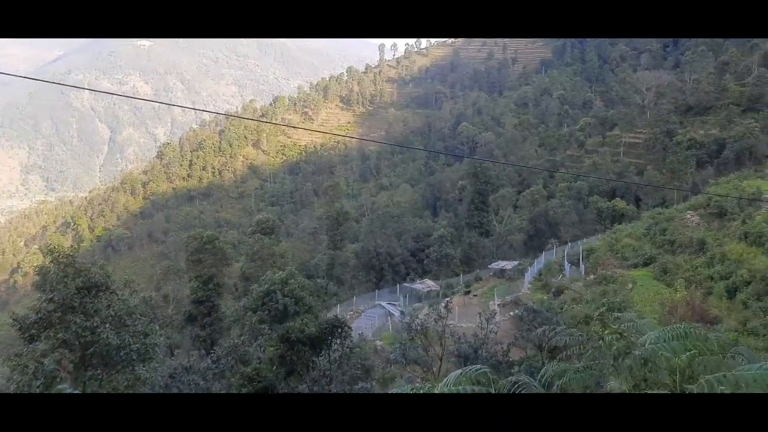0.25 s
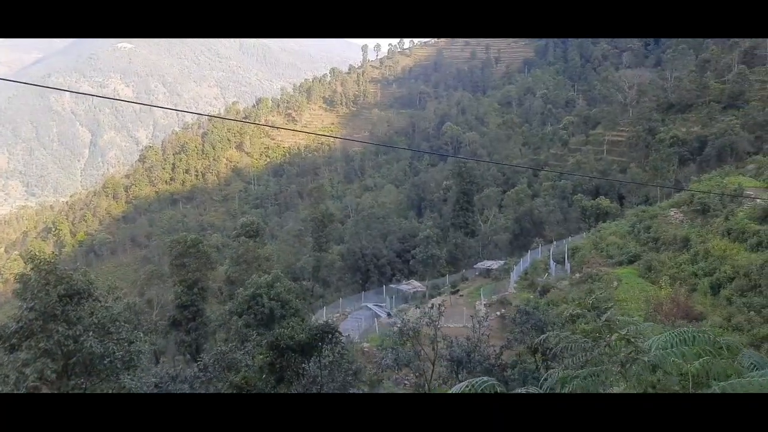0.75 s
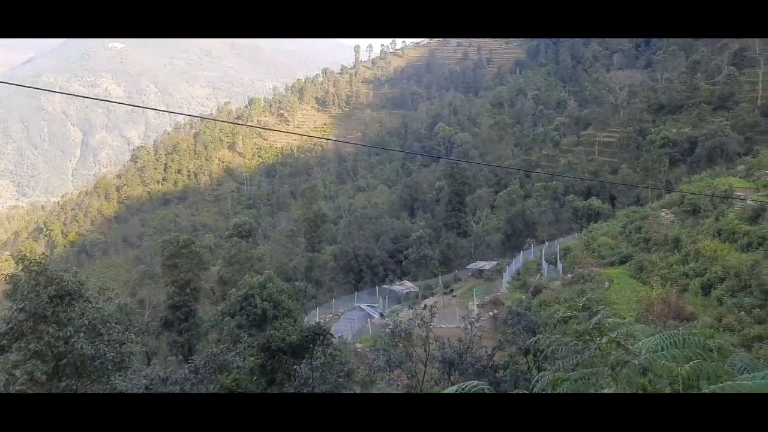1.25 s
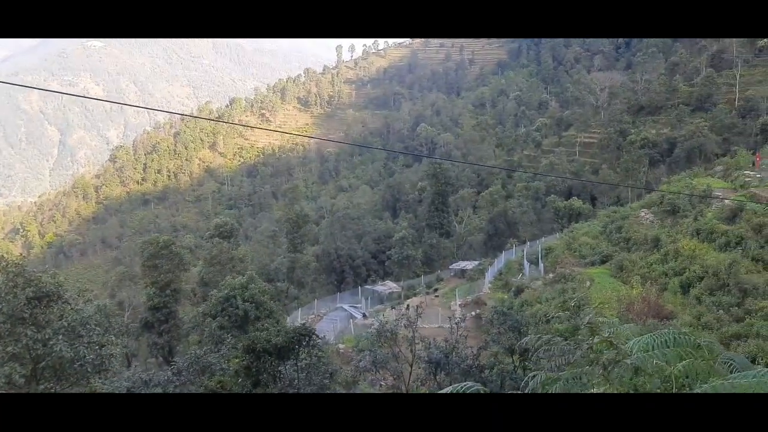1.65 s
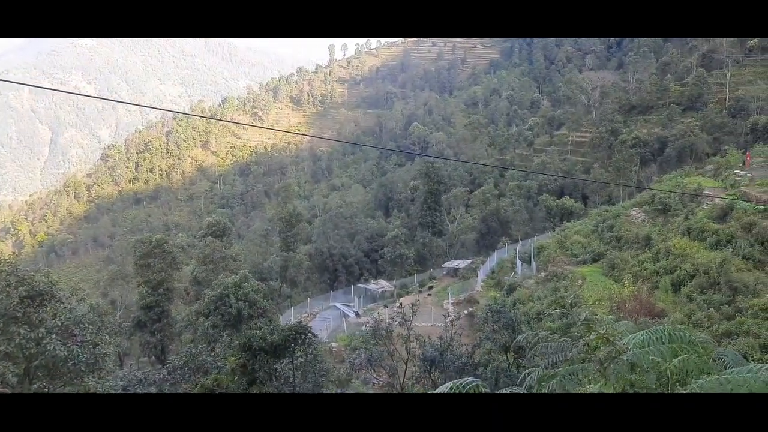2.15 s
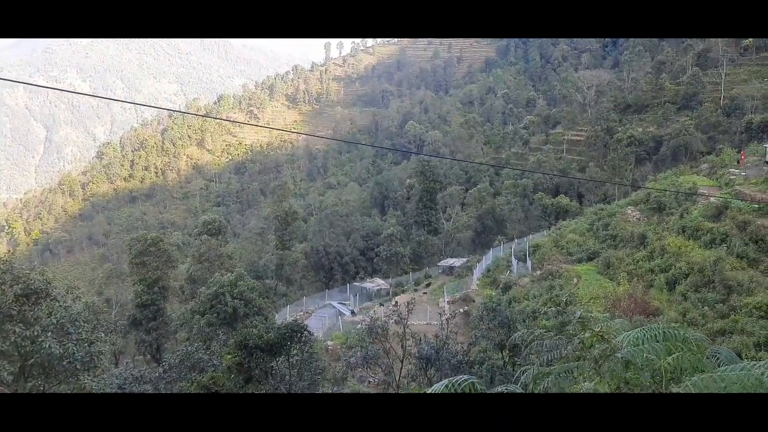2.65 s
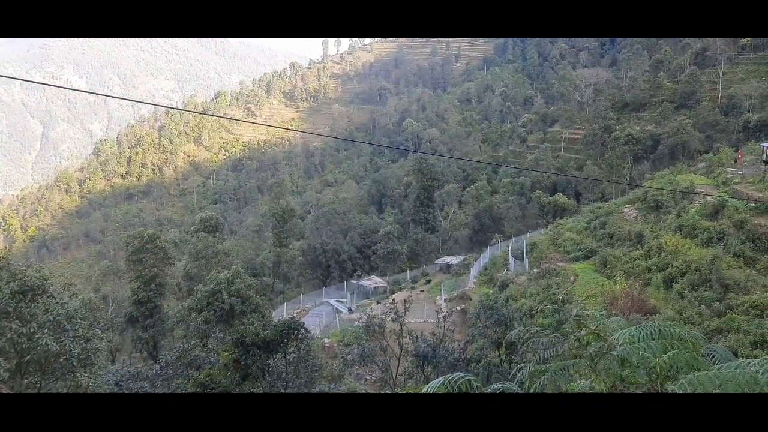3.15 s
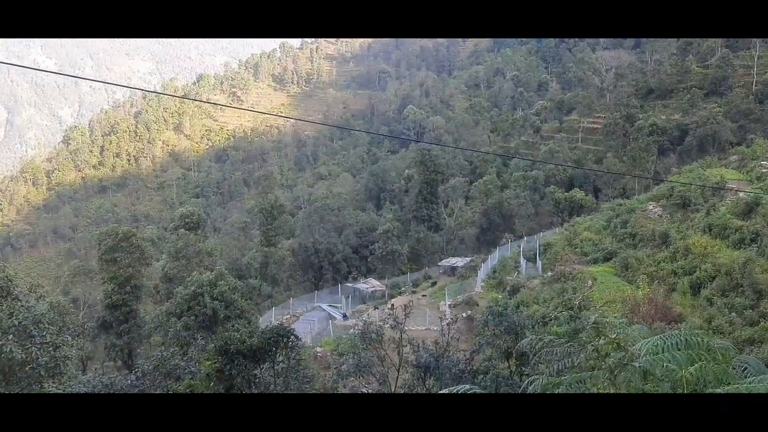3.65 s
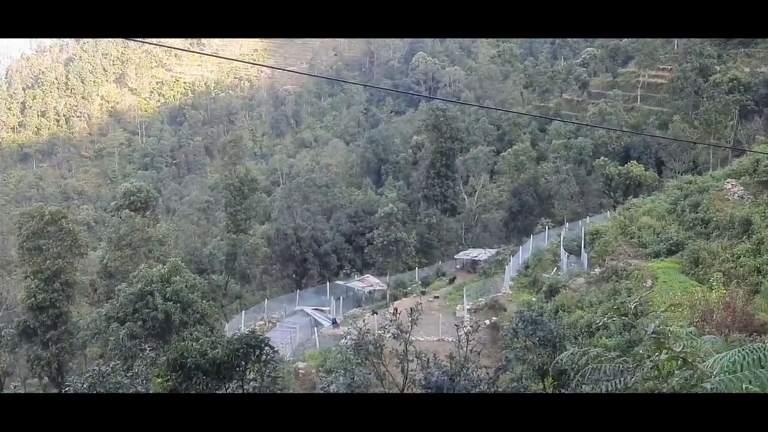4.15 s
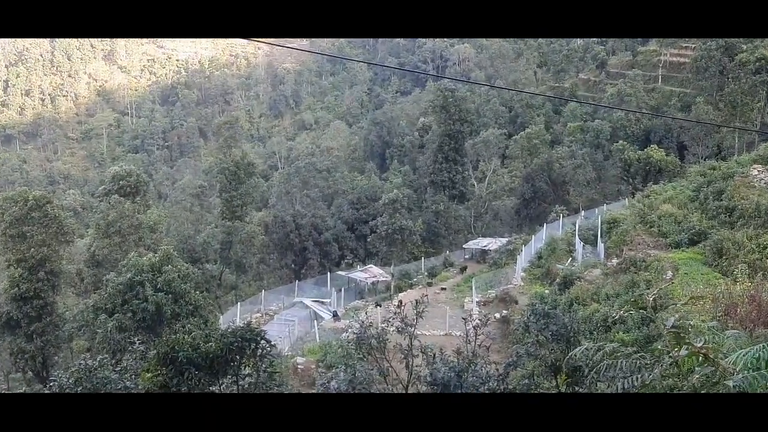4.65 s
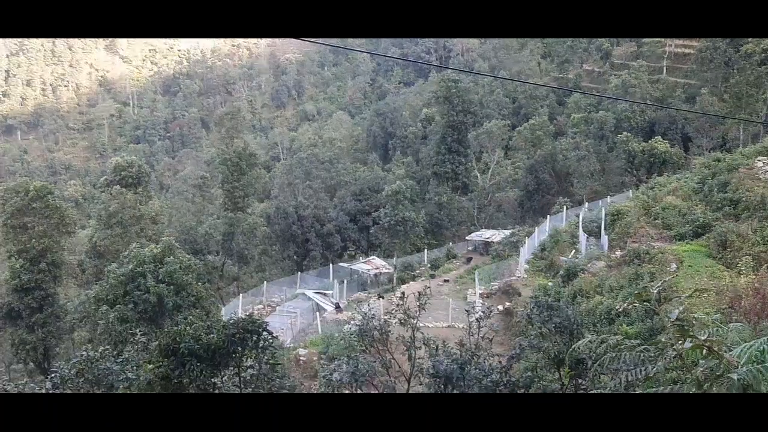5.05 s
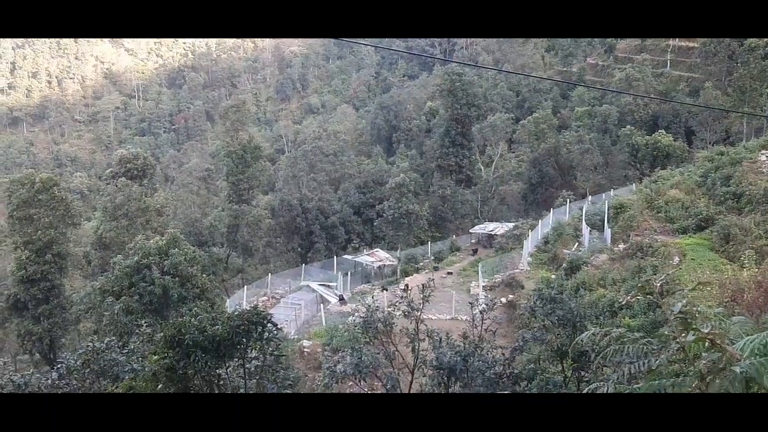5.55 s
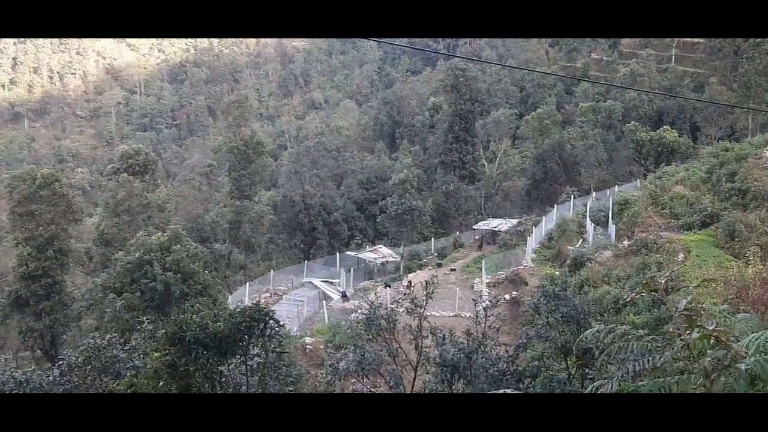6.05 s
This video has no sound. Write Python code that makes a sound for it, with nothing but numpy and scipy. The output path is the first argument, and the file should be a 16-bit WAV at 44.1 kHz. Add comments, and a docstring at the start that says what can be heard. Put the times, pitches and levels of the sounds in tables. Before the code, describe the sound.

Outdoors on a quiet wooded slope, heard through a hand-held stereo microphone. At 0.1 s two large dogs bark together, slightly right of centre: one higher and stronger, around 500 Hz, the other deep and hoarse, around 330 Hz. Each bark is short, under a quarter second, with scatter from trees and a quick slope echo. The high dog barks again at 0.4, the deep one at 0.55 and alone at 1.4, 2.25 and 2.6. Until about 1.5 s a sleeve rustles close by and fingers knock and tick on a case; a faint tap follows at 2.1. Soft hiss swells between 1.6 and 3.5. From 2.9 to 3.8 both dogs overlap almost continuously, then bark more separately at 4.2, 4.4, 4.9, 5.1, 5.4 and 5.55. Raspy birds chirp faintly, mainly around 3.4-3.9, with barely audible drones and high chirps near 5.9 as echoes fade into still air.

```python
"""Wooded hillside: two large dogs bark together, the deep hoarse one goes on alone, then both bark across each other.
Barks are jittered pulse trains and turbulence through throat resonances; scatter and a slope echo are sparse taps.
Birds call faintly as rasping glides; narrow noise bands make faint drones; coloured noise makes still air.
Close by, a sleeve rustles (noise under stroke envelopes) and fingers tap a hand-held case (decaying bursts);
a soft hiss swells and fades (coloured noise under slow envelopes)."""
import sys
import numpy as np
from scipy import signal
from scipy.fft import rfft, irfft, next_fast_len
from scipy.io import wavfile
from scipy.ndimage import uniform_filter1d

SR = 44100
rng = np.random.default_rng(int(sys.argv[2]) if len(sys.argv) > 2 else 0)


def wrap_up_sound(samples):
    """Save the sound to the file named by the first command line argument, as 16-bit audio."""
    columns = np.atleast_2d(samples).T
    # keep every value between -1 and 1, then stretch to whole-number steps
    tamed = np.clip(columns, -1, 1)
    steps = np.round(tamed * 32767).astype(np.int16)
    wavfile.write(sys.argv[1], SR, steps)


N = 278254
TIME = np.arange(N) / SR


def amp(db):
    """Decibels to gain."""
    return 10 ** (np.asarray(db) / 20)


def unit(x):
    """Scales to rms 1."""
    return x / np.sqrt(np.mean(x ** 2) + 1e-30)


def read(points, hz):
    """Interpolates a table on a log-frequency axis."""
    f, value = np.transpose(points)
    return np.interp(np.log(hz + 1), np.log(f + 1), value)


def add(mix, start_s, sound):
    """Mixes a sound in at start_s, cut at the end of the mix."""
    part = mix[..., round(start_s * SR):][..., :sound.shape[-1]]
    part += sound[..., :part.shape[-1]]


def shape(x, gain):
    """Filters x by a gain that is a function of frequency."""
    size = next_fast_len(x.shape[-1] + 4096)
    hz = np.fft.rfftfreq(size, 1 / SR)
    return irfft(rfft(x, size) * gain(hz), size)[..., :x.shape[-1]]


def ring(x, modes):
    """Passes x through steep-sided resonances (f/Hz, width/Hz, level/dB), summed in power."""
    def gain(f):
        power = sum(amp(db) ** 2 / (1 + ((f - hz) / width_hz) ** 2 * 2) ** 4 for hz, width_hz, db in modes)
        return np.sqrt(power)
    return shape(x, gain)


def wander(size, corner_hz):
    """Low-passed noise of rms 1: slow random drift."""
    return unit(shape(rng.standard_normal(size), lambda f: 1 / (1 + (f / corner_hz) ** 4)))


def hiss(colour, same):
    """Stereo noise of a given colour and rms 1, more alike in both ears in the bass."""
    common, apart = rng.standard_normal(N), rng.standard_normal((2, N))
    likeness = lambda f: same / (1 + (f / 2000) ** 2)
    noise = shape(common, lambda f: np.sqrt(likeness(f)))
    noise = noise + shape(apart, lambda f: np.sqrt(1 - likeness(f)))
    return unit(shape(noise, lambda f: amp(read(colour, f))))


def swells_gain(rows):
    """Gain of a series of swells: exponential rise to each peak and exponential fade, summed in power."""
    power = 0
    for peak_s, db, swell_s, fade_s in rows:
        distance = np.maximum((peak_s - TIME) / swell_s, (TIME - peak_s) / fade_s)
        power = power + amp(db) ** 2 * np.exp(-2 * distance)
    return np.sqrt(power)


def echoes(envelope):
    """Sparse reflections of random sign, other ones in each ear, under an envelope of time and frequency."""
    density = .06
    taps = rng.choice([-1., 1.], (2, SR)) * (rng.random((2, SR)) < density)
    hz, t, z = signal.stft(unit(taps), SR, nperseg=256)
    gain = envelope(t[None], hz[:, None]) + 0 * hz[:, None]
    # equal energy in every frequency bin
    gain = gain / np.sqrt((gain ** 2).sum(1, keepdims=True) * 128 + 1e-20)
    return signal.istft(z * gain, SR, nperseg=256)[1]


def air(level_db=-75):
    """Still air over the valley: steady coloured noise."""
    # spectrum of the air: f/Hz, relative level/dB (per Hz)
    colour = [(15, -46), (25, -23), (96, -4), (240, -9), (359, -5), (399, -6.5), (509, -3), (945, -20),
              (3260, -26), (3630, -26.5), (6730, -25.5), (9810, -26.5), (15500, -23)]
    return amp(level_db) * hiss(colour, same=0.83)


def rustle(lift_db=2, grain_db=1.5, grain_hz=250):
    """The sleeve drags lightly as the hand shifts its grip: cloth slides in tiny slips."""
    # drags of the sleeve: peak t/s, level/dB before lift, swell/s, fade/s
    drags = [(.012, -46.5, 0.077, 0.059), (.29, -65.5, .035, 0.084), (.54, -60, 0.026, 0.084),
             (.725, -60, .03, 0.048), (.81, -53.5, 0.02, 0.041), (.87, -53, 0.13, 0.077),
             (1.12, -55.5, 0.029, 0.069), (1.21, -61.5, 0.037, 0.088), (1.38, -51, 0.032, 0.053),
             (1.47, -70.5, .05, 0.34), (2.14, -64, 0.25, 0.12), (2.48, -64, 0.082, 0.047)]
    # spectrum of the cloth: f/Hz, relative level/dB
    colour = [(40, -3), (110, -5), (300, 2.5), (520, 6.5), (900, 3), (1700, -4), (2700, -0.5), (4000, -2.5),
              (7000, -3), (9500, -5.5), (12500, -1), (15500, -4)]
    slips = amp(lift_db + grain_db * wander(N, grain_hz))
    return swells_gain(drags) * slips * hiss(colour, same=0.63)


def finger_taps(tick_decay_s=0.0029, knock_decay_s=0.0031):
    """Fingers tick against the case: decaying noise plus a knock of the case's resonances."""
    # taps: t/s, peak level/dB, knock re tick/dB
    rows = [(.027, -24.5, 20), (0.049, -30.5, 9), (0.536, -41, -8), (0.608, -39.5, 6), (0.657, -47, 1),
            (.882, -35, -33), (0.958, -43.5, 17), (1.113, -32, -21), (1.122, -32.5, -19), (1.208, -42, -24),
            (1.229, -47, -1), (1.239, -42.5, -3), (1.382, -32, -28), (2.127, -52, 12)]
    # case resonances: f/Hz, width/Hz, relative level/dB
    case = [(504, 330, 9), (964, 560, 10), (1310, 440, -9), (2510, 2300, -12.5)]
    out = np.zeros((2, N))
    t = TIME[:2000]
    for start_s, peak_db, knock_db in rows:
        tick = rng.standard_normal((2, len(t))) * np.exp(-t / tick_decay_s)
        knock = unit(ring(rng.standard_normal(len(t)), case)) * np.exp(-t / knock_decay_s)
        tap = tick + amp(knock_db) * knock
        add(out, start_s, amp(peak_db) * tap / abs(tap).max())
    return out


def effort(length_s, top_hz, chest_db, mouth_db, edge_db, crest, drop, hoarse, arch):
    """Pitch, levels and roughness of a bark follow one arch of effort; the jaws move and the voice clears."""
    climb_curve, drop_curve = 1.8, 3.0  # exponents: pitch holds near its top
    shudder_db, shudder_hz = 1.44, 24
    hoarse_start = .6  # share of the clear tone that is still noise at the start
    u = np.linspace(0, 1, round(length_s * SR))
    before = np.maximum(1 - u / crest, 0)
    after = np.maximum((u - crest) / (1 - crest), 0)
    climb = arch["scoop"] * before ** climb_curve
    fall = drop * np.sin(np.pi / 2 * after) ** drop_curve
    hz = top_hz * (1 - climb - fall)
    level_db = chest_db - arch["rise_db"] * before ** arch["flatness"]
    level_db -= arch["fall_db"] * after ** arch["flatness"]
    level_db += shudder_db * wander(len(u), shudder_hz)
    bright_db = arch["close_db"] * (.5 - u) + arch["flare_db"] * (before + after) ** 2
    gape = np.exp(-((u - arch["gape_at"]) / arch["gape_width"]) ** 2)
    gape_db = arch["gape_db"] * (gape - gape.mean())
    rough = hoarse + hoarse_start * (1 - hoarse) * np.sqrt(before)
    return hz, level_db, mouth_db + bright_db + gape_db, edge_db + bright_db, rough


def bark(hz, chest_db, mouth_db, edge_db, rough, throat, split_hz, trim_db):
    """Jittery vocal-fold pulses and puffs of turbulence ring the throat, in chest, mouth and edge bands."""
    t = np.arange(len(hz)) / SR
    turns = np.cumsum(hz * (1 + .06 * rough * wander(len(t), 110))) / SR
    folds = sum(np.cos(2 * np.pi * k * turns) for k in range(1, 25))
    # strong and weak pulses alternate: half-pitch growl
    folds *= 1 + .65 * rough * np.cos(np.pi * turns + wander(len(t), 40))
    puffs = (.4 + np.exp(-(turns % 1) / .3)) * rng.standard_normal(len(t))

    def drive(share):
        return np.sqrt(1 - share) * unit(folds) + np.sqrt(2.3 * share) * unit(puffs)

    # jaw drops as pitch rises: the throat's clock runs faster, lifting all its resonances
    ticks = np.cumsum(hz ** .4)
    clock = np.interp(ticks, ticks[[0, -1]], t[[0, -1]])

    def voiced(x):
        return np.interp(clock, t, ring(np.interp(t, clock, x), throat))

    # the fundamental stays clearer than the overtones
    low, high = voiced(drive(rough ** 2)), voiced(drive(rough))
    below = lambda f, corner_hz: 1 / (1 + (f / corner_hz) ** 16)
    chest = shape(low, lambda f: below(f, split_hz[0]))
    mouth = shape(high, lambda f: below(f, split_hz[1]) - below(f, split_hz[0]))
    edge = shape(high, lambda f: 1 - below(f, split_hz[1]))
    # level each band over 900 samples (20 ms), so the dB curves set its loudness
    steady = lambda x: x / np.sqrt(uniform_filter1d(x ** 2, size=900) + 1e-12)
    voice = amp(trim_db[0]) * steady(chest)
    voice += amp(mouth_db + trim_db[1]) * steady(mouth)
    voice += amp(edge_db + trim_db[2]) * steady(edge)
    ramp_s = .028
    swell = np.sin(np.pi / 2 * np.clip(np.minimum(t, t[-1] - t) / ramp_s, 0, 1))
    return amp(chest_db) * voice * swell


def woods(x, scatter_s=0.0051, build_s=0.0026, slope_s=0.113, spread_s=0.0093, slope_lift=3):
    """Trunks smear a bark; the forest rings on, and the facing slope answers at slope_s."""
    # scatter from nearby trunks: f/Hz, level/dB
    trunk_levels = [(300, -22), (800, -5.5), (1500, -0.5), (2500, -1), (6000, 4.5)]
    # far slope's echo: f/Hz, level/dB
    slope_levels = [(150, -4.5), (330, -10), (600, -16.5), (1500, -13.5), (2500, -8), (6000, 0)]
    # far decay: f/Hz, t60/s
    slope_t60 = [(200, 0.88), (330, 0.45), (600, 0.86), (1500, 0.45), (2500, 0.39), (7000, 0.099)]

    def far_envelope(t, f):
        decay = amp(-60 * t / read(slope_t60, f))
        build = 1 - np.exp(-t / build_s)
        answer = 1 + slope_lift * np.exp(-((t - slope_s) / spread_s) ** 2)
        return decay * build * answer

    near_taps = echoes(lambda t, f: np.exp(-t / scatter_s) * (t > 0))
    far_taps = echoes(far_envelope)
    near = signal.fftconvolve(x[None], near_taps, axes=1)
    far = signal.fftconvolve(x[None], far_taps, axes=1)
    scatter_gain = lambda f: amp(read(trunk_levels, f))
    direct = np.pad(x, (0, near.shape[1] - len(x))) + shape(near, scatter_gain)
    # offset the power that scatter adds
    direct = shape(direct, lambda f: 1 / np.sqrt(1 + scatter_gain(f) ** 2 / 2))
    return direct + shape(far, lambda f: amp(read(slope_levels, f)))


def dogs(lag_s=.00008, woof_db=-38):
    """Both dogs, a little to the right by level and lag; each bark draws its own paths through the woods."""
    # deep dog: t/s, length/s, top pitch f/Hz, then before trim: chest level/dB, mouth re chest/dB,
    # edge re chest/dB; final pitch drop [0-1], hoarseness [0-1]
    deep_barks = [(0.135, 0.18, 303.8, -38, 1, -14.5, 0.37, 0.85),
                  (0.543, 0.14, 330.6, -37, 0.1, -34, 0.26, 0.42),
                  (1.41, 0.18, 337.8, -34, -3.5, -22.6, 0.41, 0.6),
                  (2.263, 0.16, 360.2, -35, 0.1, -24.1, 0.5, 0.65),
                  (2.58, 0.18, 337.8, -38, -2, -24, 0.32, 0.74),
                  (2.906, 0.19, 335.6, -39, -3.5, -31.5, 0.05, 0.65),
                  (3.14, 0.23, 322.5, -36, -8, -35.5, 0.31, 0.51),
                  (3.448, 0.194, 322.7, -36.5, -7, -27.5, 0.35, 0.28),
                  (3.772, 0.174, 319.2, -39.5, -6.5, -33.5, 0.27, 0.6),
                  (4.164, 0.14, 311, -51.5, -6.5, -40, 0, 0.77),
                  (5.135, 0.17, 346.8, -36, -0.5, -22.5, 0.49, 0.66),
                  (5.54, 0.17, 332.4, -37, -0.5, -22.5, 0.22, 0.76)]
    # high dog: same columns, but crest position [0-1] in place of pitch drop
    high_barks = [(0.104, 0.18, 518.3, -28, -3.5, -23.0, 0.52, 0.7),
                  (0.408, 0.17, 508.0, -31, -4, -30.5, 0.7, 0.43),
                  (3.029, 0.17, 521, -31, 1.2, -23.5, 0.44, 0.55),
                  (3.294, 0.214, 497.0, -30.5, -1, -23.5, 0.48, 0.37),
                  (3.658, 0.15, 465.3, -46.5, -4, -22.0, 0.49, 0.4),
                  (4.374, 0.139, 512.9, -30.5, -3.5, -22.0, 0.64, 0.49),
                  (4.872, 0.17, 521.7, -32, -0.5, -23, 0.5, 0.65),
                  (5.394, 0.174, 515.6, -32.5, -4.5, -27, 0.51, 0.5)]
    # throat resonances before the jaw's shift: f/Hz, width/Hz, relative level/dB
    deep_throat = [(334, 137, 8.5), (513, 450, -2), (619, 96, 1.5), (876, 380, -12), (1613, 400, -21.5),
                   (2240, 360, -26), (2724, 6800, -46.5), (4520, 520, -35.5), (5760, 550, -45.5),
                   (8350, 1500, -49)]
    high_throat = [(520, 210, -7), (730, 280, 0.5), (1397, 346, -11), (2425, 160, -25.5),
                   (3150, 220, -35.5), (2310, 2100, -34), (4393, 460, -39.5), (7070, 2900, -45)]
    # arch of effort: gain up to the crest and loss after it [dB], flatness of top [exponent], low start
    # of pitch [share]; overtones: loss along the bark and excess at the ends [dB, signed];
    # mouth band during the gape: lift [dB, signed], place and width [shares of length]
    deep_arch = dict(rise_db=15, fall_db=17, flatness=2.05, scoop=.35, close_db=6, flare_db=4, gape_db=6, gape_at=0.26, gape_width=0.085)
    high_arch = dict(rise_db=21.5, fall_db=18, flatness=1.28, scoop=.19, close_db=-2, flare_db=-1.4, gape_db=-0.5, gape_at=.55, gape_width=.17)
    # left minus right: f/Hz, level/dB
    side = [(150, -3.5), (320, -0.5), (510, -6.5), (750, -1.5), (1400, -7), (2200, -1.5), (8000, 0.5)]
    deep_crest, high_drop = .52, .2
    deep_split_hz, high_split_hz = (450, 1350), (600, 1950)  # chest to mouth, mouth to edge
    voices = np.zeros((2, N))
    for start_s, *levels, drop, hoarse in deep_barks:
        course = effort(*levels, deep_crest, drop, hoarse, deep_arch)
        add(voices, start_s, woods(bark(*course, deep_throat, deep_split_hz, trim_db=(.6, -.4, .3))))
    for start_s, *levels, crest, hoarse in high_barks:
        course = effort(*levels, crest, high_drop, hoarse, high_arch)
        add(voices, start_s, woods(bark(*course, high_throat, high_split_hz, trim_db=(1.2, -.3, -1.5))))
    # low puffs of air follow the force of the barks
    chest = ring(voices.mean(0), [(294, 54, 3.5), (520, 150, -32.5)])
    force = np.sqrt(abs(uniform_filter1d(chest ** 2, size=900)))
    voices += amp(woof_db) * force * unit(ring(rng.standard_normal(N), [(153, 380, 0)]))
    ears = np.array([[.5], [-.5]])

    def direction(f):
        lag = lag_s / (1 + (f / 1200) ** 2)
        return amp(ears * read(side, f)) * np.exp(-2j * np.pi * ears * lag * f)

    return shape(voices, direction)


def birds(echo_db=-7, echo_t60_s=0.38):
    """Short raspy slurs and thin peeps: glides modulated by narrow noise, blurred by the trees."""
    # calls: t/s, length/s, start f/Hz, end f/Hz, width/Hz, level/dB
    rows = [(0.359, 0.061, 2385, 2430, 320, -56), (0.368, 0.083, 2840, 2950, 300, -65),
            (1.669, 0.2, 7700, 7900, 1100, -82), (3.397, 0.083, 2446, 2420, 340, -44.5),
            (3.41, 0.066, 2990, 2980, 378, -54), (3.53, 0.077, 4450, 4480, 59.5, -76),
            (3.636, 0.078, 3760, 3780, 61.2, -74), (3.672, 0.095, 2434, 2360, 320, -52),
            (3.7, 0.094, 2935, 2620, 384, -57.5), (3.812, .09, 4500, 4600, 110, -84),
            (3.938, 0.078, 3810, 3790, 60, -80), (4.59, .13, 7850, 7800, 1170, -77.5),
            (5.844, 0.066, 8000, 7580, 650, -72), (5.89, .06, 7570, 7500, 710, -79.5)]
    calls = np.zeros(N)
    for start_s, length_s, start_hz, end_hz, width_hz, db in rows:
        size = round(length_s * SR)
        glide_hz = np.linspace(start_hz, end_hz, size)
        turn = np.exp(2j * np.pi * np.cumsum(glide_hz) / SR)
        rasp = wander(size, width_hz / 2) + 1j * wander(size, width_hz / 2)
        add(calls, start_s, amp(db) * np.hanning(size) * (turn * rasp).real)
    trees = echoes(lambda t, f: amp(-60 * t / echo_t60_s))
    return calls + amp(echo_db) * signal.fftconvolve(calls[None], trees, axes=1)[:, :N]


def drones():
    """Faint wavering hums and a thin buzz: narrow noise bands, partly shared by the ears, fade in and out."""
    # drones: start t/s, end t/s, f/Hz, width/Hz, level/dB
    rows = [(0.8, 5.6, 104, 16, -89), (2.77, 4.1, 110, 30, -68.5), (3, 3.95, 1175, 20, -73),
            (3.94, 4.15, 1170, 20, -76), (3.75, 4.2, 2900, 36, -80), (4.051, 4.45, 4550, 840, -79)]
    out = np.zeros((2, N))
    for start_s, end_s, hz, width_hz, db in rows:
        size = round((end_s - start_s) * SR)
        common, left, right = ring(rng.standard_normal((3, size)), [(hz, width_hz, 0)])
        hum = unit(common + .5 * np.array([left, right]))
        add(out, start_s, amp(db) * signal.windows.tukey(size, .4) * hum)
    return out


def hiss_swells(grain_db=1.3, grain_hz=40):
    """Soft hiss, strongest near 2.3 kHz and 6 kHz, swells and fades with a fine grain."""
    # swells: peak t/s, level/dB, swell/s, fade/s
    swells = [(1.6, -64, .07, 0.064), (2.07, -59, 0.17, 0.16), (2.37, -52, 0.089, 0.069),
              (2.66, -56, 0.057, 0.11), (2.96, -62.5, 0.073, 0.15), (3.25, -57.5, 0.32, 0.26),
              (4.03, -71, 0.11, 0.054)]
    # spectrum of the hiss: f/Hz, relative level/dB
    colour = [(300, -15.5), (1500, -26), (1950, -5.5), (2350, 0.5), (2750, -3.5), (3400, -20), (4500, -18),
              (5400, -12), (6400, -11), (7600, -19.5), (9500, -31), (15000, -32.5)]
    return swells_gain(swells) * amp(grain_db * wander(N, grain_hz)) * hiss(colour, same=0.12)


def scene():
    """Dogs and birds on the hill, sleeve and taps close by, soft hiss swells, faint drones and quiet air."""
    return air() + rustle() + finger_taps() + dogs() + birds() + drones() + hiss_swells()


def record(dry, low_cut_hz=45, edge_hz=15750):
    """Microphone's bass roll-off, then a steep band limit at edge_hz."""
    high_pass = signal.butter(2, low_cut_hz, "highpass", fs=SR, output="sos")
    thinned = signal.sosfilt(high_pass, dry)
    low_pass = signal.firwin(511, edge_hz, window=("kaiser", 9), fs=SR)
    return signal.oaconvolve(thinned, low_pass[None], "same")


dry = scene()
out = record(dry)
wrap_up_sound(out)
```